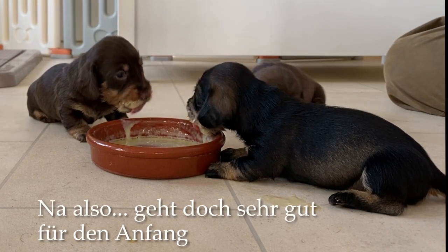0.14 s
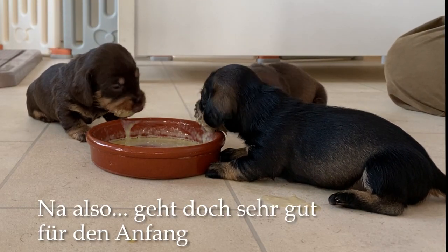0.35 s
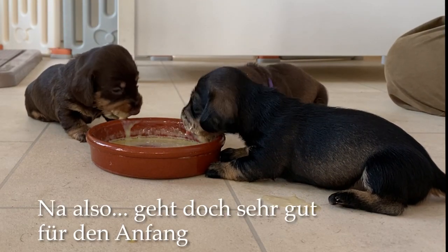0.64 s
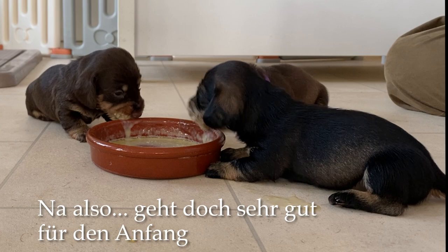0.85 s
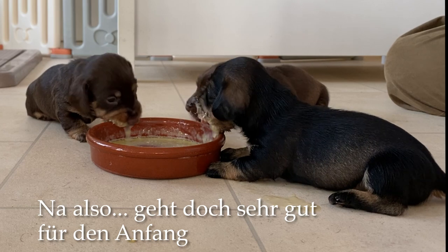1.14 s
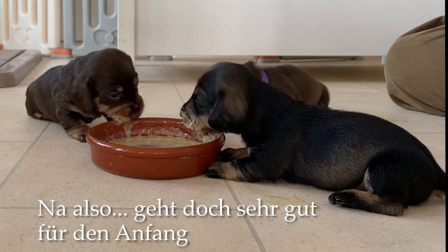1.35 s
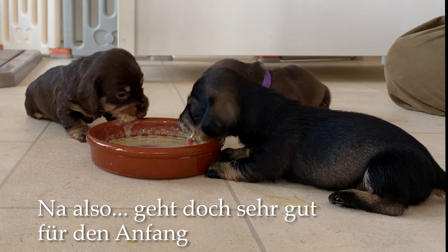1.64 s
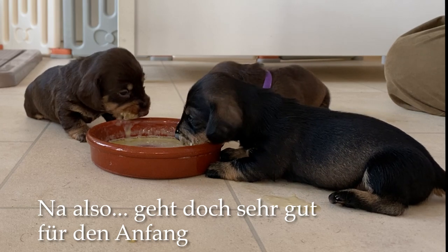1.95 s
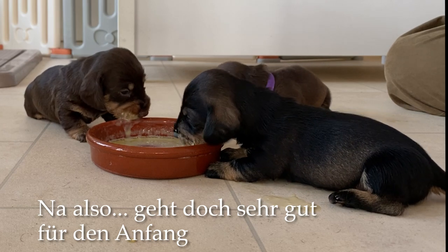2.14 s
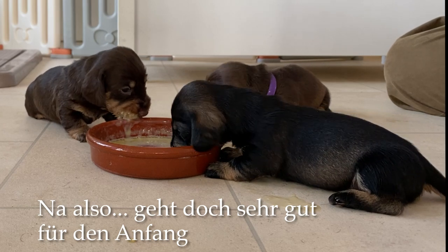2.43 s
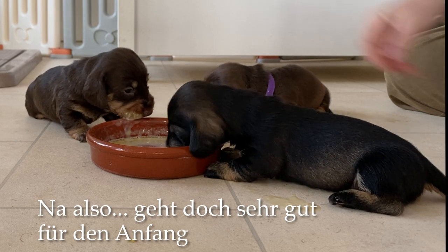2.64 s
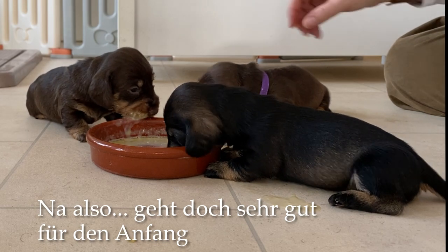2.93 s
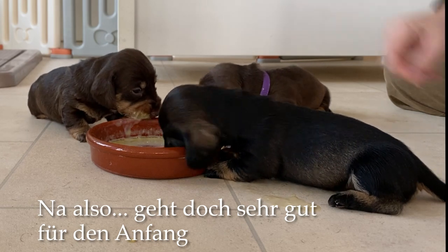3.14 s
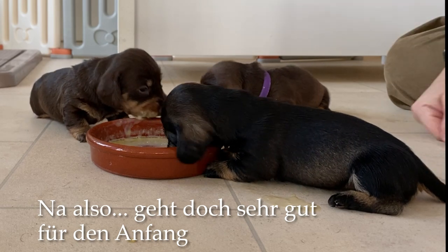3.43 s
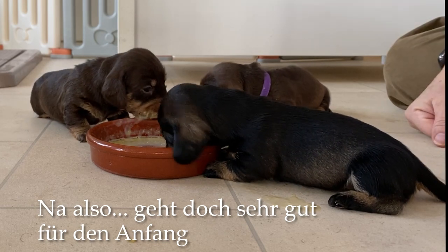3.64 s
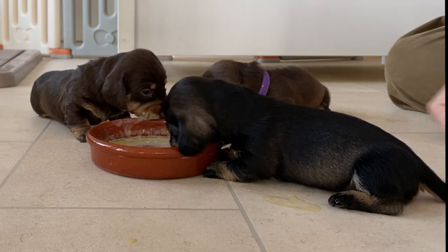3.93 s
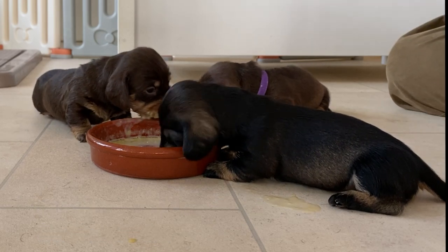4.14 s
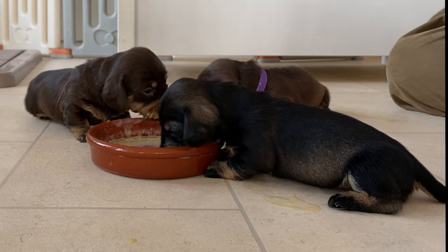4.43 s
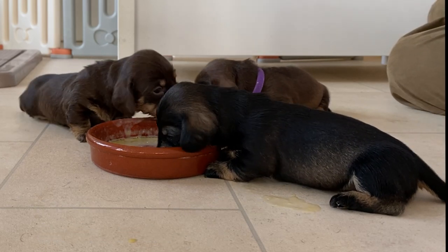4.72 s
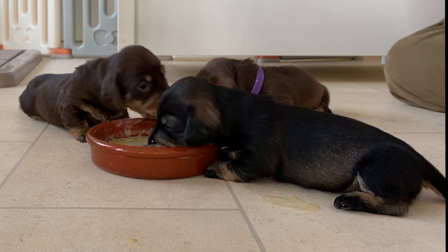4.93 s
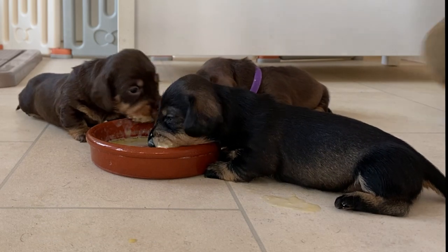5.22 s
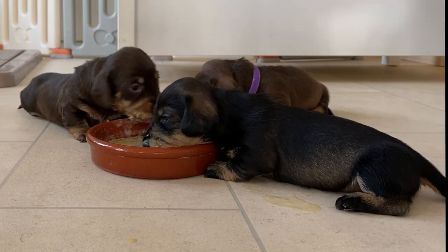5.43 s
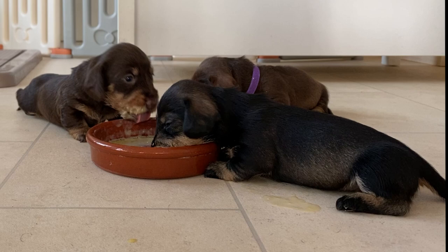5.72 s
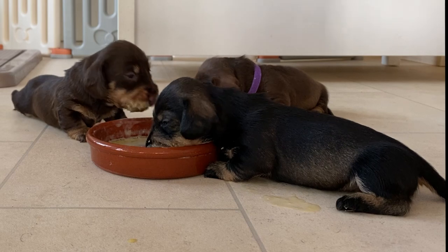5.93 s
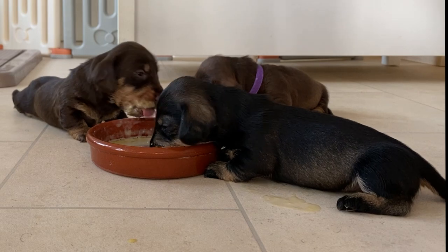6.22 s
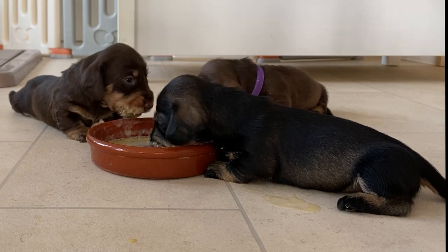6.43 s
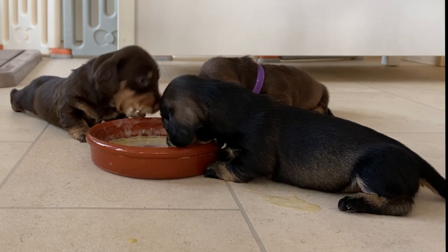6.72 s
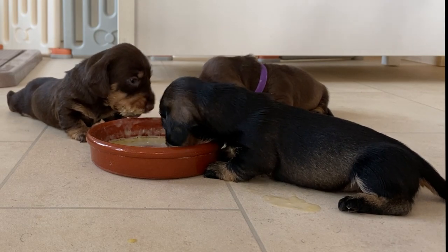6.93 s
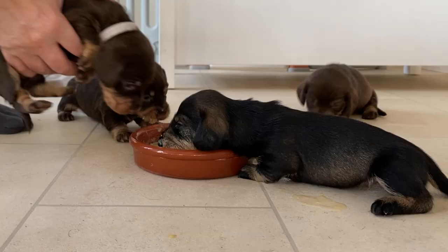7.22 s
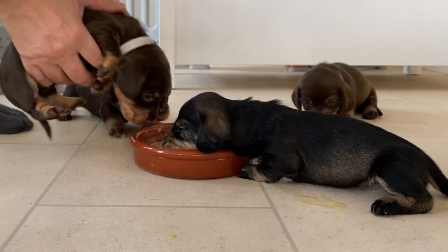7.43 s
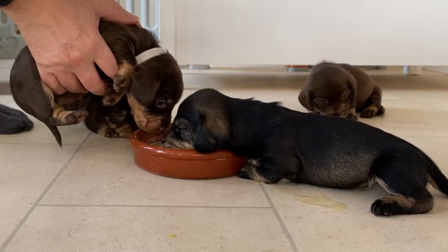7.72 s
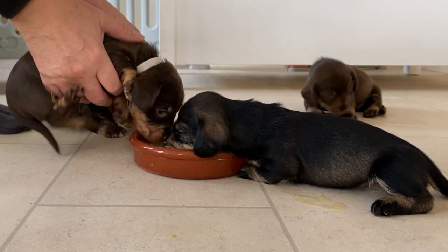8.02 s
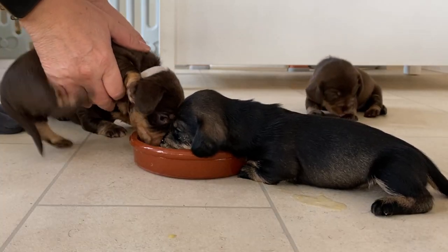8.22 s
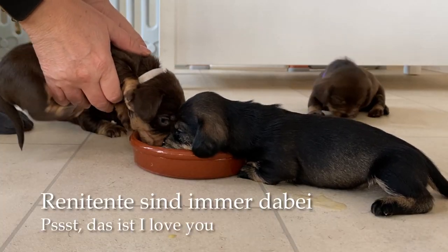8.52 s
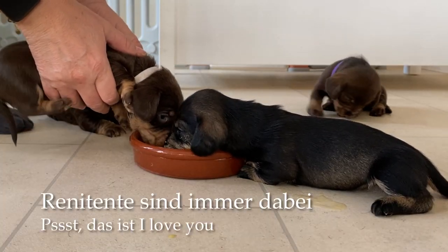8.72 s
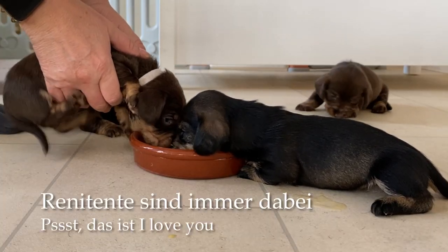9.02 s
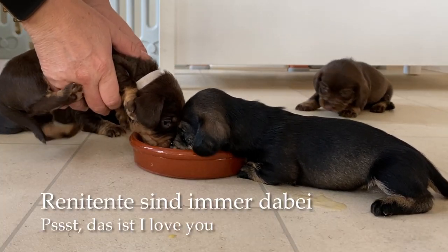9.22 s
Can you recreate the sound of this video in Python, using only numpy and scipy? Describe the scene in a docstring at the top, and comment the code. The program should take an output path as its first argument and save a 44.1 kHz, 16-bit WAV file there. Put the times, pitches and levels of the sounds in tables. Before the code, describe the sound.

Delicate, irregular licking ticks and wet splutters come from a bowl on tiles, with tiny dropping puppy yips between them. Someone's clothing rubs quietly, swelling after the middle, while paws scuff and knock the floor. Then a puppy is picked up: a short whine, three piercing squeals and a few trailing whines, far louder than everything before. Close microphone, lively indoor room with a short tail.

```python
"""Small puppies at a milk bowl on a tiled floor, over room tone and rustling cloth (filtered noise).
First tongues click (ringing snaps), yips and short whimpers sound (harmonic stacks through a throat filter),
and paws scuff, bump and patter (noise crackle, damped knocks), patters loudest near 5 s.
After 7 s come whines and three high squeals as one is picked up, and the cloth turns quieter.
The hard room rings after every call: early echoes and a diffuse tail."""
import sys
import numpy as np
from scipy import signal
from scipy.fft import rfft, irfft, next_fast_len
from scipy.io import wavfile
from scipy.ndimage import uniform_filter1d, map_coordinates

SR = 44100
rng = np.random.default_rng(int(sys.argv[2]) if len(sys.argv) > 2 else 0)


def output_pcm(signal):
    """Save a mono or channel-first signal as 16-bit PCM at the path in sys.argv[1].

    Samples are clipped to [-1, 1] before scaling.
    """
    pcm = np.clip(np.atleast_2d(signal).T, -1, 1) * 32767
    wavfile.write(sys.argv[1], SR, np.round(pcm).astype(np.int16))


N = 413216
TIME_S = np.arange(N) / SR
TOP_HZ = 15760  # band limit

# Cloth level, interpolated. Each row: time in seconds, body in dB (3 dB over its level), hiss in dB (2 dB over).
RUSTLE_LEVELS = [(0.0, -70.5, -81), (0.46, -77, -86.5), (0.98, -79, -84.5), (1.51, -84, -86),
                 (2.03, -79, -80.5), (2.35, -81, -84.5), (2.49, -72.5, -78), (2.71, -81, -87),
                 (2.99, -76, -82), (3.82, -79.5, -82), (5.04, -65, -72.5), (5.4, -65.5, -70),
                 (6.11, -70, -75), (6.33, -66.5, -68), (6.63, -66, -73.5), (7.15, -72, -71)]
# Spectrum of rubbing cloth. Each row: frequency in Hz, relative level in dB.
CLOTH_SPECTRUM = [(180, -57), (300, -18), (461, -8), (509, -6), (720, -9.5), (835, -9), (1300, -4.5),
                  (1510, -10.5), (2560, -9.5), (7500, -13.5), (15500, -26)]
# Low room tone. Each row: frequency in Hz, relative level in dB.
HUM_SPECTRUM = [(12, -57), (20, -20.5), (60, 2), (76, 3), (97, -5), (145, -2.5), (229, -5), (265, -9.5),
                (367, -8.5), (403, -11.5), (500, -10), (650, -21), (1100, -120)]
# High room tone. Each row: frequency in Hz, relative level in dB.
AIR_SPECTRUM = [(200, -13), (550, 0), (1200, -13), (2400, -3), (3800, -19.5), (7000, -14), (10000, -35.5),
                (15000, -13.5)]
# Shuffling paws, interpolated. Each row: time in seconds, level of the faintest patter in dB.
SHUFFLE_LEVELS = [(0, -88), (4.3, -64), (4.8, -58), (5.4, -68), (5.9, -70), (7.2, -85)]
# Tongue clicks. Each row: start in seconds, level before the mouth filter in dB, nominal mouth resonance in Hz,
# snap noise against the ring in dB.
LICK_EVENTS = [(0.045, -49, 1990, -18), (0.1997, -56, 2660, -23), (0.3394, -54, 2700, -30),
               (0.5856, -53, 2370, -31), (0.7236, -46, 2160, -27), (0.7697, -44.5, 3120, -16),
               (0.7835, -41.5, 2090, -27), (1.06, -58, 2780, -11), (1.2885, -46, 1840, -10.5),
               (1.4606, -53.5, 2400, -26), (1.5758, -54.5, 1740, -12), (1.9689, -47.5, 2050, -4.5),
               (2.488, -63, 2240, 4.5), (2.6363, -46, 1790, -10.5), (2.681, -49, 2180, -31),
               (2.858, -57.5, 1770, -3.5), (3.1058, -51.5, 2480, -27), (3.2917, -52, 2170, -27),
               (3.3144, -49.5, 2010, -17), (3.4828, -58, 2630, -27), (3.9477, -53.5, 2470, -7),
               (4.1197, -51, 2650, -46), (4.131, -56.5, 2580, -3.5), (4.5055, -55, 2540, -19),
               (4.565, -55, 1830, -26), (5.8352, -46, 2470, -35), (6.331, -44, 2430, -13),
               (6.8464, -42.5, 2500, -22)]
# Yips and grunts. Each row: start in seconds, length in seconds, pitch in Hz, last pitch in Hz,
# level before the throat in dB, roughness from 0 to 1.
YIP_EVENTS = [(0.065, 0.02, 686, 500, -51, 0.13), (0.908, 0.023, 789, 613, -50, 0.25),
              (1.103, 0.035, 838, 770, -45, 0.37), (1.309, 0.027, 724, 690, -45, 0.37),
              (1.74, 0.025, 836, 660, -43, 0.37), (2.823, 0.013, 794, 590, -48, 0.5),
              (3.769, 0.0215, 367, 254, -55, 0.95), (3.977, 0.028, 834, 763, -46, 0.37),
              (4.215, 0.023, 892, 710, -46.5, .3), (4.428, .016, 633, 384, -53, 0.2),
              (4.623, 0.0174, 673, 447, -52, 1), (4.814, .025, 773, 383, -45.5, .99),
              (6.031, 0.0053, 566, 388, -52.5, 1), (6.238, .017, 813, 587, -51, 0.2),
              (6.976, 0.032, 790, 496, -44, 0.94)]
# Throat and mouth half closed. Each row: frequency in Hz, gain in dB.
HALF_CLOSED_THROAT = [(350, -0.5), (750, -2.5), (1150, 5), (1450, -4.5), (2100, -2.5), (2850, -28.5),
                      (4100, -27.5), (4900, -25.5), (6100, -11.5), (7200, -26.5), (8200, -26.5),
                      (9500, -33.5), (11500, -31), (13000, -47)]
# Throat and mouth wide open. Each row: frequency in Hz, gain in dB.
WIDE_OPEN_THROAT = [(350, -25), (1150, -0.5), (1500, -5), (2050, 3), (2700, -16), (3200, -33),
                    (4000, -26.5), (4700, -37.5), (5900, -16.5), (7400, -37.5), (8300, -24), (9600, -40),
                    (11000, -36.5), (15500, -47.5)]
# Hiss at the vocal folds. Each row: frequency in Hz, relative level in dB.
AIRFLOW_SPECTRUM = [(400, -30), (1000, 7), (2000, -3), (3200, 14.5), (6000, 5.5), (12000, 17.5)]
# Wet splutters and scuffs. Each row: start of the decay in seconds, rise plus decay constant in seconds,
# level at the top in dB, treble tilt in dB.
SCUFF_EVENTS = [(0.233, 0.027, -63.5, -6), (0.76, 0.022, -55.5, -20), (0.783, 0.05, -53.5, 2.5),
                (1.846, 0.029, -60, 2), (1.985, 0.027, -67.5, 5), (2.325, 0.058, -61.5, 2.5),
                (2.421, 0.02, -65, -6), (3.698, 0.022, -67.5, 5), (5.146, 0.035, -62.5, -23),
                (5.496, 0.079, -64, 8.5), (5.781, 0.014, -60, 15), (6.334, 0.0092, -56.5, 6),
                (6.833, 0.025, -51, 14.5), (6.926, 0.0064, -48.5, 11.5), (7.134, 0.015, -52.5, -9),
                (7.149, 0.013, -50.5, -8), (7.885, 0.026, -67, 9), (8.157, 0.02, -63, 9),
                (8.35, 0.01, -61, 13), (9.125, 0.007, -57.5, -1)]
# Whimpers. Each row: start in seconds, length in seconds, time to the lowest pitch in seconds, first, lowest
# and last pitch in Hz, level before the throat in dB, overtones at the lowest pitch in dB.
WHIMPER_EVENTS = [(1.516, 0.031, .015, 980, 685, 937, -44, -2.5),
                  (2.572, 0.034, 0.019, 1183, 872, 963, -47.5, -1),
                  (6.446, .044, 0.032, 1115, 848, 890, -46, -5.5),
                  (6.678, .08, .049, 1354, 839, 927, -47, 3.5),
                  (7.319, 0.033, 0.0148, 1054, 874, 1107, -38, -1.5)]
# Soft bumps on floor and bowl. Each row: start in seconds, level before the knock and puff gains in dB, pitch in Hz.
BUMP_EVENTS = [(1.97, -56, 625), (2.298, -45, 860), (2.605, -48.5, 139.5), (3.315, -46.5, 784),
               (4.574, -51.5, 336), (4.836, -39.5, 370), (5.008, -48.5, 202), (5.028, -50.5, 83),
               (5.269, -54, 238), (5.518, -43, 580), (6.536, -43, 120), (6.569, -47.5, 97),
               (7.128, -44, 447), (7.148, -37.5, 277), (7.695, -53, 350)]
# Long cries. Each row: start in seconds, length in seconds, time of mouth opening in seconds, closed pitch in Hz,
# crest pitch in Hz, time of the crest in seconds, droop in Hz, last pitch in Hz, closed and open level before
# the throat in dB, open-mouth overtones in dB, open-mouth edge in dB, rasp from 0 to 1.
WHINE_EVENTS = [(7.198, 0.0455, .02, 635, 607, .04, 59, 590, -58.5, -63.5, 2.5, -10, .3),
                (7.346, .105, .046, 697.5, 819, 0.11, 101.5, 1003, -40.5, -47.5, 3.5, -3.5, 0.8),
                (8.606, 0.16, 0.038, 850, 921.4, .063, 63.4, 1120, -38, -39.5, 8, -2, 0.16),
                (8.921, .119, 0.021, 811, 851, .072, 286, 1014, -38, -43.5, 4, 0.5, 0.5),
                (9.184, 0.14, 0.031, 686, 734, 0.08, 178.4, 718, -44.5, -46.5, 8, 4.5, 0.48)]
# Squeals. Each row: the same columns, in the same units, as the whines.
SQUEAL_EVENTS = [(7.6, 0.19, 0.03, 1242, 1392, 0.12, 87, 1170, -26, -36.5, 2.3, 0.56, 0.4),
                 (7.928, .2, .046, 1220, 1391, .095, 85, 1122, -24.5, -36, 5.5, 5.9, .3),
                 (8.259, .21, 0.037, 1211, 1357, .14, 45.8, 1177, -25.5, -34.5, 2, 5.2, 0.24)]
# First echoes. Each row: delay in seconds, gain as a ratio.
WALL_ECHOES = [(.0043, 0.0089), (.0091, -0.03), (0.0133, 0.17), (.0188, .06), (.0262, 0.024)]
# Colour of the room's tail. Each row: frequency in Hz, relative strength in dB.
TAIL_COLOUR = [(150, 2), (800, -3.5), (1400, 0), (3300, -3.5), (6000, 2), (8300, 5), (14000, 5.5)]
# Decay of the room's tail. Each row: frequency in Hz, time to fall 60 dB in seconds.
TAIL_T60 = [(150, 0.25), (700, 0.47), (1400, 0.43), (3000, 0.45), (8000, 0.4), (15000, 0.16)]

YIP_START_RATIO = 1.26  # first pitch over main pitch
FULL_YIP_DB, BRIGHTEN_DB_PER_DB = -42, 1.34  # overtones lose this much per dB under a full yip
SCUFF_RISE_SHARE = 0.35  # share of a scuff spent swelling
DIP_POWER, FADE_IN_DB, FADE_OUT_DB, WHIMPER_EDGE_DB = 1.6, 7, 2.5, -13.5  # dip shape, weaker ends, treble edge
BUMP_CYCLES = 23  # to fall 60 dB
DROOP_S = 0.1  # distance from the crest at which the full droop is reached
# Random wavering of the fundamental's level while the mouth is open.
FUNDAMENTAL_WAVER_DB, WAVER_KNOTS_PER_S = 2, 46.8


def amp(db):
    """Decibels to gain."""
    return 10 ** (np.asarray(db) / 20)


def unit(x):
    """Scale to rms 1."""
    return x / np.sqrt(np.mean(x ** 2) + 1e-20)


def along(points, hz):
    """Read (Hz, value) points on a log axis."""
    point_hz, values = np.transpose(points)
    return np.interp(np.log(hz + 1), np.log(point_hz + 1), values)


def filtered(x, response):
    """Multiply the spectrum of x by a response of frequency."""
    size = next_fast_len(len(x) + 8192)
    spectrum = rfft(x, size) * response(np.fft.rfftfreq(size, 1 / SR))
    return irfft(spectrum, size)[:len(x)]


def noise(spectrum, size=N):
    """Coloured noise of rms 1."""
    return unit(filtered(rng.standard_normal(size), lambda hz: amp(along(spectrum, hz))))


def wobble(knots_per_s, size=N):
    """Smooth random curve through random knots."""
    knots = rng.standard_normal(int(size * knots_per_s / SR) + 4)
    return map_coordinates(knots, [np.arange(size) * knots_per_s / SR])


def add(track, start_s, sound):
    """Mix a sound into the track."""
    start = max(round(start_s * SR), 0)
    track[start:start + len(sound)] += sound[:max(N - start, 0)]


def background():
    """Steady room tone; cloth rubs and rumbles as someone shifts about, then drops 8 dB."""
    s, *columns = np.transpose(RUSTLE_LEVELS)
    body_db, hiss_db = [np.interp(TIME_S, s, c) for c in columns]
    cloth = noise(CLOTH_SPECTRUM) * amp(1.5 * wobble(250) + 0.69 * wobble(16))
    body = filtered(cloth, lambda hz: 1 / (1 + (hz / 3500) ** 4))
    hiss = cloth - body
    rumble = noise([(25, -31), (70, -0.5), (180, -6.5), (420, -8.5), (700, -27.5), (2000, -78)])
    rumble = rumble * amp(3.5 * wobble(10))
    rustle = unit(body) * amp(body_db - 3) + rumble * amp(body_db - 8) + unit(hiss) * amp(hiss_db - 2)
    moving = amp(np.interp(TIME_S, [7.14, 7.25], [0, -8]))
    hum = amp(-73.5) * noise(HUM_SPECTRUM) * amp(1.5 * wobble(6.5))
    air = amp(-77) * noise(AIR_SPECTRUM)
    return rustle * moving + hum + air


def shuffling():
    """Paws and bellies scrape the tiles as the puppies crowd the bowl: faint damped sines at random times."""
    t = np.arange(SR // 25) / SR
    out = np.zeros(N)
    for when, size, pitch in rng.random((320, 3)):
        start_s = when * SHUFFLE_LEVELS[-1][0]
        busy_db = np.interp(start_s, *np.transpose(SHUFFLE_LEVELS))
        hz = 230 * 4.5 ** pitch
        decay = amp(busy_db + 3.7 * size ** 2 - 60 * t / 0.021)
        add(out, start_s, decay * np.sin(2 * np.pi * hz * t))
    return out


def lick(db, hz, treble_db, t60_s=0.011, spread_s=0.0045):
    """A film of milk breaks in four tiny snaps that ring in the mouth."""
    t = np.arange(SR // 20) / SR
    out = np.zeros(len(t))
    for i, (gap, detune) in enumerate(rng.random((4, 2))):
        age = np.maximum(t - spread_s * i * (0.5 + gap), 0)
        ring_hz = hz * (0.878 + 0.27 * detune)
        ring = np.sin(2 * np.pi * ring_hz * age) * amp(-60 * age / t60_s)
        snap = 0.98 * amp(treble_db - 60 * age / 0.011) * rng.standard_normal(len(t)) * (age > 0)
        out += amp(db - 5.4 * i) * (ring + snap)
    mouth = [(400, -33), (1500, -4.5), (8000, 7), (14000, -36)]
    return filtered(out, lambda f: amp(along(mouth, f)))


def lapping():
    """Tongues lap milk: clear licks among many faint ones at random times."""
    out = np.zeros(N)
    for start_s, db, hz, treble_db in LICK_EVENTS:
        add(out, start_s, lick(db, hz, treble_db))
    for when, size, mouth in rng.random((90, 3)):
        add(out, when * N / SR, lick(-73 + 14 * size ** 2, 1600 * 4.0 ** mouth, -23, t60_s=0.0094))
    return out


def call(rows, throat, jitter, flutter_db, rasp, grit, attack_s=0.00292, release_s=0.00394):
    """Vocal folds sound a gliding harmonic stack with hiss; throat and mouth colour it."""
    s, *columns = np.transpose(rows)
    t = np.arange(s[0] - attack_s, s[-1] + release_s, 1 / SR)
    pitch, level_db, overtone_db, edge_db = [np.interp(t, s, c) for c in columns]
    pitch = uniform_filter1d(pitch, size=130)
    # Where the pitch breaks quickly the folds lose their grip: high partials give way to hiss.
    grip = 1 / (1 + (np.gradient(np.log(pitch)) * SR / 12) ** 2)
    pitch = pitch * (1 + jitter * wobble(600, len(t)) + 0.003 * wobble(71.7, len(t)))
    k = np.arange(1, 23)[:, None]  # partial numbers
    shrill = k * pitch > 3200
    # Pressing harder lifts the overtones and adds a shrill edge, whose partials tremble one by one.
    tremble = 1 + grit * np.array([wobble(499, len(t)) for _ in k])
    edge_gains = amp(edge_db) * grip * tremble
    gains = np.where(shrill, edge_gains, amp(overtone_db * (k > 1))) * (k * pitch < TOP_HZ)
    phase = 2 * np.pi * np.cumsum(pitch) / SR
    tone = np.sqrt(2) * np.sum(gains * np.sin(k * phase), axis=0)
    # Air through the gap pulses once a cycle.
    hiss = rasp * noise(AIRFLOW_SPECTRUM, len(t)) * (1 + 0.19 * np.sin(phase))
    hiss = hiss * amp(edge_db / 2 + 11.3 * (1.5 - grip))
    fade_in = np.clip((t - t[0]) / (attack_s * 1.47), 0, 1)
    fade_out = np.clip((t[-1] - t) / release_s, 0, 1)
    level = amp(level_db + flutter_db * wobble(172.7, len(t)))
    source = (tone + hiss) * fade_in * fade_out * level
    return filtered(source, lambda hz: amp(along(throat, hz)))


def yips():
    """One brief push of air whose pitch drops as it fades; the harder the push, the brighter."""
    out = np.zeros(N)
    for s, length, hz, last_hz, db, rough in YIP_EVENTS:
        overtone_db = BRIGHTEN_DB_PER_DB * (db - FULL_YIP_DB)
        # Time in s, pitch in Hz, level, overtones and edge in dB.
        rows = [(s, hz * YIP_START_RATIO, db - 11.5, overtone_db + 4, -14),
                (s + 0.2 * length, hz, db, overtone_db, -15),
                (s + 0.616 * length, hz * 0.96, db - 5, overtone_db - 3.5, -18),
                (s + length, last_hz, db - 5, overtone_db - 16, -24)]
        add(out, s - 0.002, call(rows, HALF_CLOSED_THROAT, jitter=0.13 * rough, flutter_db=3.5,
                                 rasp=0.41 * rough, grit=0.25, attack_s=0.00207))
    return out


def scuffs():
    """Short swells of crackle: tiny snaps of very uneven size, bunched in clumps, over finer noise."""
    out = np.zeros(N)
    t = np.arange(-SR // 10, SR // 5) / SR
    for s, length, db, treble_db in SCUFF_EVENTS:
        rise_s, fall_s = SCUFF_RISE_SHARE * length, (1 - SCUFF_RISE_SHARE) * length
        colour = [(150, 2), (600, 1.5), (1400, 1.5), (2700, 1), (4500, treble_db - 11),
                  (8000, treble_db - 12.5), (14000, treble_db - 21)]
        snaps = rng.standard_normal(len(t)) * (rng.random(len(t)) < 1800 / SR)  # 1800 per s on average
        crackle = unit(snaps) + 0.7 * rng.standard_normal(len(t))
        clumped = crackle * amp(2.9 * wobble(134.3, len(t)))
        grains = unit(filtered(clumped, lambda hz: amp(along(colour, hz))))
        swell = np.exp(-np.abs(t / np.where(t < 0, rise_s, fall_s)) ** 1.73)
        add(out, s + t[0], grains * amp(db) * swell)
    return out


def whimpers():
    """A short cry that slides down to its lowest, strongest point and turns up again."""
    out = np.zeros(N)
    for s, length, low_s, first_hz, low_hz, last_hz, db, overtone_db in WHIMPER_EVENTS:
        t = np.arange(0, length, 1 / SR)
        before = np.clip(1 - t / low_s, 0, 1) ** DIP_POWER
        after = np.clip((t - low_s) / (length - low_s), 0, 1) ** DIP_POWER
        pitch = low_hz + (first_hz - low_hz) * before + (last_hz - low_hz) * after
        level_db = db - FADE_IN_DB * before - FADE_OUT_DB * after
        rows = np.column_stack([s + t, pitch, level_db, overtone_db + 4 * before - 7 * after,
                                WHIMPER_EDGE_DB + 2 * after])
        add(out, s - 0.003, call(rows, HALF_CLOSED_THROAT, jitter=0.0091, flutter_db=3.5, rasp=0.66, grit=0.15))
    return out


def bumps():
    """Paws and knees meet the floor: a damped knock with a dull puff of noise."""
    out = np.zeros(N)
    t = np.arange(SR // 3) / SR
    for s, db, hz in BUMP_EVENTS:
        t60_s = BUMP_CYCLES / hz
        knock = np.sin(2 * np.pi * hz * t)
        puff = noise([(hz / 3, -14), (hz, 0), (hz * 2, -9), (hz * 8, -36), (hz * 30, -60)], len(t))
        envelope = amp(db - 60 * t / t60_s) * (1 - np.exp(-t / 0.0014))
        add(out, s, (0.4 * knock + 0.5 * puff) * envelope)
    return out


def long_cry(row, opening_s, break_s, scoop, scoop_s, closed_overtone_db, closed_edge_db,
             onset_db, onset_s, break_db, break_edge_db):
    """Rows for one cry: it swells with the mouth closed, turns shrill as it opens, breaks at the end."""
    (s, length, opens_s, closed_hz, crest_hz, crest_s, droop_hz, last_hz,
     closed_db, open_db, overtone_db, edge_db) = row
    t = np.arange(0, length, 1 / SR)
    mouth = 0.5 + 0.5 * np.tanh((t - opens_s) / opening_s)  # 0 closed, 1 open
    breaking = np.exp(-((length - t) / break_s) ** 4)
    arch = crest_hz - droop_hz * ((t - crest_s) / DROOP_S) ** 2
    pitch = (closed_hz + (arch - closed_hz) * mouth) * (1 + scoop * np.exp(-(t / scoop_s) ** 2))
    pitch = pitch + (last_hz - pitch) * breaking
    closed = 1 - mouth * (1 - breaking)
    # Added to the level, taken off overtones and edge: only the fundamental wavers.
    waver_db = FUNDAMENTAL_WAVER_DB * wobble(WAVER_KNOTS_PER_S, len(t)) * (1 - closed)
    level_db = closed_db + (open_db - closed_db) * mouth
    level_db = level_db - onset_db * np.exp(-t / onset_s) + break_db * breaking + waver_db
    overtones_db = overtone_db + closed_overtone_db * closed - waver_db
    edges_db = edge_db + closed_edge_db * (1 - mouth) + break_edge_db * breaking - waver_db
    return np.column_stack([s + t, pitch, level_db, overtones_db, edges_db])


def whines():
    """Held cries that swoop in from above and mostly flick upward at the end."""
    out = np.zeros(N)
    for *row, rasp in WHINE_EVENTS:
        rows = long_cry(row, opening_s=0.014, break_s=0.0064, scoop=0.37, scoop_s=0.0065,
                        closed_overtone_db=-7.5, closed_edge_db=-9.5, onset_db=0.5, onset_s=0.013,
                        break_db=2.6, break_edge_db=-5.5)
        add(out, row[0] - 0.003, call(rows, HALF_CLOSED_THROAT, jitter=0.006 * rasp, flutter_db=3.64 * rasp,
                                      rasp=rasp, grit=0.29))
    return out


def squeals():
    """High cries through a wide mouth: a loud round start, a shrill arch, a sudden drop."""
    out = np.zeros(N)
    for *row, rasp in SQUEAL_EVENTS:
        rows = long_cry(row, opening_s=0.011, break_s=0.0059, scoop=-0.02, scoop_s=0.022,
                        closed_overtone_db=-12.5, closed_edge_db=-18.5, onset_db=11.5, onset_s=0.0079,
                        break_db=3, break_edge_db=-15)
        add(out, row[0] - 0.003, call(rows, WIDE_OPEN_THROAT, jitter=0.0031, flutter_db=1.24, rasp=rasp,
                                      grit=0.36, release_s=0.0025))
    return out


def room(x, wet_db):
    """Floor and cupboards echo first; a diffuse noise tail dies away, each band at its own rate."""
    hz, t, z = signal.stft(rng.standard_normal(SR * 3 // 4), SR, nperseg=256)
    decay_db = along(TAIL_COLOUR, hz)[:, None] - 60 * t / along(TAIL_T60, hz)[:, None]
    tail = signal.istft(z * amp(decay_db), SR, nperseg=256)[1]
    tail = tail * np.clip(np.arange(len(tail)) / SR / 0.025, 0, 1)  # 25 ms build-up
    response = amp(wet_db) * tail / np.linalg.norm(tail)
    for delay_s, gain in WALL_ECHOES:
        response[round(delay_s * SR)] += gain
    return x + signal.fftconvolve(x, response)[:N]


def scene():
    """Voices ring more than the floor sounds; the background stays dry."""
    voices = yips() + whimpers() + whines() + squeals()
    floor = lapping() + scuffs() + bumps() + shuffling()
    return (room(voices, wet_db=-8.5) + room(floor, wet_db=-18) + background())[None]


def record(dry):
    """Remove everything from the band limit up."""
    return filtered(dry[0], lambda hz: hz < TOP_HZ)[None]


dry = scene()
out = record(dry)
output_pcm(out)
```